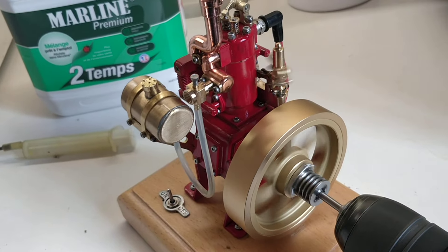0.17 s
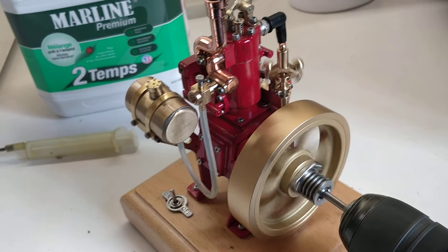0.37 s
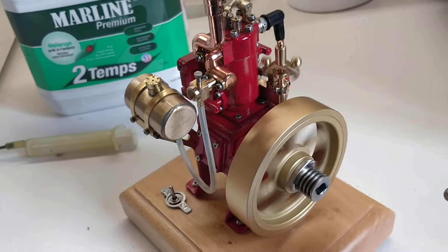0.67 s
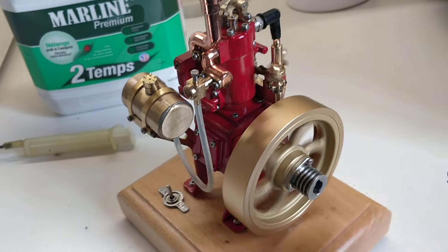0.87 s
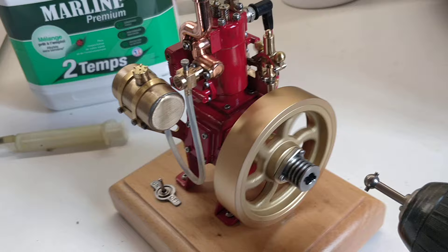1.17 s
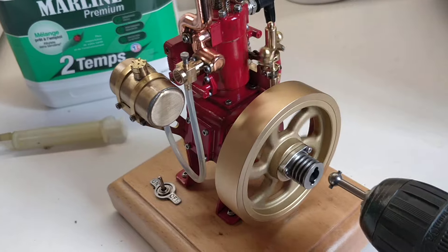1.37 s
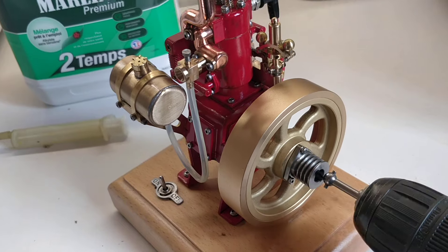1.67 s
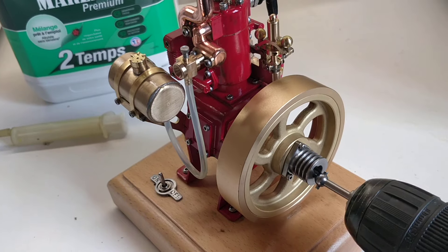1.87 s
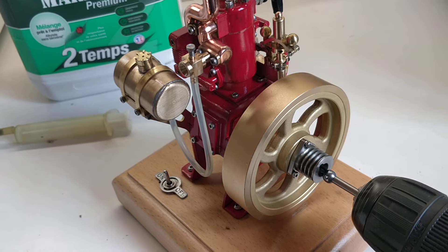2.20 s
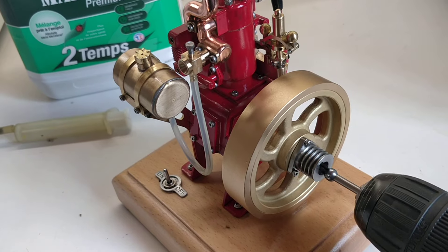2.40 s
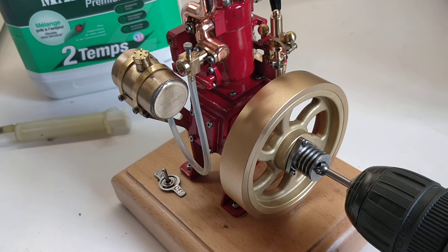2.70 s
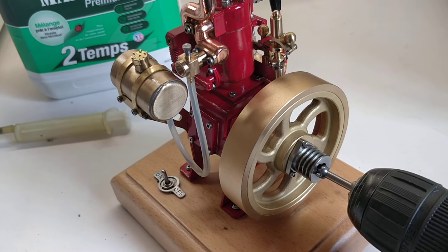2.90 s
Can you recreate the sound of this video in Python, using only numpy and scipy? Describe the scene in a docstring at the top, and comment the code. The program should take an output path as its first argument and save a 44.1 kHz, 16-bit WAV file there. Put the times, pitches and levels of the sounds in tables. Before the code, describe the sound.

A cordless drill whines while cranking a small engine, then winds down with metallic clicks.

```python
"""Cordless drill cranking a model engine

Close microphone at a bench in a small workroom, mono. The drill spins the flywheel, is pulled off and
brakes; the engine never fires. Light handling ticks, a blip of the trigger, and the bit is seated in
the hub again. The motor whines on its shaft orders, the gears rattle; a faint hum beats behind it."""
import sys
import numpy as np
from scipy import signal
from scipy.fft import rfft, irfft
from scipy.io import wavfile
from scipy.ndimage import uniform_filter1d

SR = 44100
rng = np.random.default_rng(int(sys.argv[2]) if len(sys.argv) > 2 else 0)


def store_wav(level_fs):
    """Save 16-bit WAV to argv[1]."""
    pcm = np.round(np.clip(np.atleast_2d(level_fs), -1, 1) * 32767)
    wavfile.write(sys.argv[1], SR, pcm.T.astype(np.int16))


N = 134505
T = np.arange(N) / SR

# room tone: f/Hz, relative level/dB
AIR_SPECTRUM = [(18, -43.5), (30, -14), (137, -10.5), (235, -17), (290, -11.5), (411, -18.5), (507, -16.5),
                (570, -20.5), (2260, -26.5), (3220, -24), (3610, -26.5), (7120, -35.5), (8000, -45),
                (10400, -78.5), (17600, -120)]
# hum lines: f/Hz, level/dB
HUM_LINES = [(226.4, -63), (244.1, -63.5), (247.8, -70), (96.9, -77), (172.3, -77), (344.5, -78)]
# handling: t/s, low level/dB, middle level/dB, high level/dB, ring f/Hz, ring level/dB
HANDLING_TICKS = [(.864, -55.5, -50, -50, 1690, -37.5), (.890, -40.5, -59, -59, 1054, -48),
                  (0.9243, -63, -40, -49, 3616, -38), (.971, -51.5, -48.5, -59, 3580, -50),
                  (1.093, -63, -51.5, -61, 1844, -52), (1.148, -64.5, -47, -49.5, 1660, -43),
                  (1.362, -69, -48, -67, 3510, -48), (1.437, -62, -55, -56, 3950, -57),
                  (1.448, -49.5, -63, -65, 520, -75), (1.725, -50, -47.5, -62, 1293, -56),
                  (1.813, -48.5, -69, -72, 1223, -60), (1.858, -49, -48.5, -56, 875, -46),
                  (1.870, -55, -70, -55, 2440, -47), (2.262, -57, -55, -62, 2502, -65),
                  (2.518, -60.5, -63, -62, 2877, -54), (2.544, -65, -59, -62, 1543, -58),
                  (2.711, -45, -49.5, -47.5, 5020, -42.5), (2.763, -52, -54, -52, 5110, -52)]
# low, middle and high resonance of a tick: f/Hz, width/Hz
TICK_RESONANCES = [(1000, 540), (1900, 1370), (4200, 2640)]
# knocks through the wooden base: t/s, level/dB, f/Hz, decay/s
BASE_KNOCKS = [(0.3482, -11, 194, 0.0043), (.889, -35, 223, 0.0045), (1.448, -40.5, 380.7, .006),
               (2.292, -52, 299.7, 0.019), (2.718, -50, 170, 0.017), (2.773, -45, 129.4, 0.014)]
# bit, chuck and spindle lock: t/s, ring level/dB, crack level/dB, crack decay/s
STEEL_CLACKS = [(0.065, -17.5, -15, 0.01), (.115, -32, -17.5, .008), (0.123, -30, -10.5, .009),
                (.331, -4, -13, .003), (0.3413, -13.5, -10.5, 0.0048), (.348, -8.5, -12.5, .006),
                (.357, -16.5, -20, .008), (0.447, -28.5, -19.5, 0.0057), (0.719, -12.5, -20, .006),
                (0.7567, -13, -19, 0.0018), (2.011, -22.5, -23, .005), (2.087, -35, -23, 0.0088),
                (2.127, -20, -22, 0.0039)]
# chuck modes: f/Hz, relative level/dB, t60/s
CHUCK_MODES = [(1750, -9, .03), (2610, 0, .02), (2850, -2, .016), (3080, -8, .018), (4230, -8, .018),
               (4750, -8, .018), (6650, -12, .015)]
# crack of steel on steel: f/Hz, relative level/dB
CRACK_SPECTRUM = [(60, -40.5), (200, -17.5), (700, -3), (1500, -0.5), (3300, 3), (5000, 2.5), (6000, 0),
                  (8000, -5.5)]
# speed controller at part throttle: t/s, f/Hz, level/dB
WHISTLE_PATH = [(1.971, 5280, -56), (1.9763, 4743, -23.5), (1.981, 3383, -28.5), (2.002, 3370, -28.5),
                (2.025, 3786, -33), (2.056, 3990, -29.5), (2.068, 4700, -25), (2.077, 4630, -35)]
# gearbox and housing response: f/Hz, relative level/dB
HOUSING_SPECTRUM = [(40, -31), (75, -29), (125, -10), (260, -15.5), (400, -10), (600, -10), (1000, -1.5),
                    (1400, -4), (1780, 2.5), (2250, -3), (2600, 0), (3200, -3), (4000, -1), (4950, -4),
                    (5600, -5.5), (7100, -0.5), (8000, -8)]
# motor whine: multiple of shaft speed, level/dB re gear noise
SHAFT_ORDERS = [(1, -15.5), (2, -24.5), (3, -15.5), (4, -19.5), (5, -21.5), (6, -13.5), (8, -16), (9, -16),
                (10, -19), (11, -21), (12, -15), (13, -20), (14, -23), (15, -19.5), (17, -21), (21, -18)]
# gear mesh tones: multiple of shaft speed, level/dB re gear noise
MESH_TONES = [(.79, -19), (2.395, -25), (6.45, -20), (7.57, -16), (7.88, -18.5), (8.47, -19), (8.66, -16),
              (10.17, -16.5), (14.75, -16.5)]
# long pull, until the trigger is let go: t/s, shaft f/Hz, gear noise level/dB
CRANKING_RUN = [(0, 335, -20), (.088, 328, -21.5), (.22, 332.8, -20.5), (.32, 330.1, -19.5),
                (.41, 335.9, -20), (.53, 331, -22), (.66, 330.4, -21), (.713, 328.3, -21)]
# short pull: t/s, shaft f/Hz, gear noise level/dB
TRIGGER_BLIP = [(1.959, 4.98, -42), (1.975, 45, -48), (1.995, 100.7, -31.5), (2.015, 153, -31),
                (2.035, 197, -26.5), (2.06, 222, -31), (2.081, 228, -28.5)]


def undb(db):
    """Decibels to gain."""
    return 10 ** (np.asarray(db) / 20)


def unit(x):
    """Scale to rms 1."""
    return x / (np.std(x) + 1e-12)


def walk(rate):
    """Smooth random drift with a spread of 1."""
    step = max(int(SR / rate), 2)
    return unit(uniform_filter1d(np.repeat(rng.standard_normal(N // step + 1), step), step)[:N])


def colour(x, points):
    """Filter by a curve of f/Hz, level/dB; rms 1."""
    hz, db = np.array(points).T
    f = np.arange(N // 2 + 1) * SR / N
    return unit(irfft(rfft(x) * undb(np.interp(np.log(f + 1), np.log(hz), db)), N))


def band(x, hz, width):
    """One resonance."""
    return signal.lfilter(*signal.iirpeak(hz, hz / width, fs=SR), x)


def low_cut(x, hz, order):
    """Roll off the bass."""
    return signal.sosfilt(signal.butter(order, hz, "high", fs=SR, output="sos"), x)


def burst(start, decay):
    """Envelope of a contact: instant rise, exponential fall."""
    return (T >= start) * np.exp(-np.abs(T - start) / decay)


def room_tone(air_db=-64):
    """Closely spaced hum lines beat against each other over still room air."""
    hum = 0
    for hz, db in HUM_LINES:
        phase = 2 * np.pi * hz * T + .34 * walk(1.7) + rng.uniform(0, 2 * np.pi)
        hum += np.sqrt(2) * undb(db) * np.sin(phase)
    return hum + undb(air_db) * colour(rng.standard_normal(N), AIR_SPECTRUM)


def room(x, wet_db, onset_s=.0078, t60_s=.23):
    """The workroom's short diffuse tail reaches the microphone just after the direct sound."""
    tail = colour(rng.standard_normal(N), [(100, -7.5), (600, 3.5), (3000, 3.5), (8000, .5)])
    tail *= burst(onset_s, t60_s / np.log(1000))
    return x + undb(wet_db) * signal.fftconvolve(x, tail / np.sqrt(np.sum(tail ** 2)))[:N]


def handling_ticks(noise_decay_s=.0047, ring_decay_s=.0038):
    """Small contacts excite three broad resonances and a short ring of the part that is touched."""
    out = 0
    for k, (hz, width) in enumerate(TICK_RESONANCES):
        contact = sum(undb(row[k + 1]) * burst(row[0], noise_decay_s) for row in HANDLING_TICKS)
        out += contact * unit(band(band(rng.standard_normal(N), hz, width), hz, 2 * width))
    for start, *_, hz, db in HANDLING_TICKS:
        out += undb(db) * burst(start, ring_decay_s) * np.sin(2 * np.pi * hz * (T - start))
    return out


def base_knocks(rise_s=.0012, upper_ratio=1.7, upper_db=-4.5):
    """The engine rocks on its wooden base: soft contacts that ring briefly in two low modes."""
    out = 0
    for start, db, hz, decay in BASE_KNOCKS:
        phase = 2 * np.pi * hz * (T - start)
        modes = np.sin(phase) + undb(upper_db) * np.sin(upper_ratio * phase)
        out += undb(db) * (burst(start, decay) - burst(start, rise_s)) * modes
    return out


def steel_clacks(detune=.013):
    """Steel chatters on steel: a crack, and the chuck rings."""
    contact = sum(undb(db) * burst(start, decay) for start, _, db, decay in STEEL_CLACKS)
    crack = contact * colour(rng.standard_normal(N), CRACK_SPECTRUM)
    ring = np.zeros(N)
    for start, db, _, _ in STEEL_CLACKS:
        ringing = (T >= start) & (T < start + .1)
        age = T[ringing] - start
        for hz, mode_db, t60 in CHUCK_MODES:
            pitch = hz * (1 + detune * rng.standard_normal())
            mode = np.sin(2 * np.pi * pitch * age + rng.uniform(0, 2 * np.pi))
            ring[ringing] += undb(db + mode_db) * np.exp(-age * np.log(1000) / t60) * mode
    return crack + ring


def controller_whistle(flutter_db=2.5):
    """The chopped motor current sings while the trigger is half pulled."""
    times, hz, db = np.array(WHISTLE_PATH).T
    pitch = np.interp(T, times, hz) * (1 + .03 * walk(500))
    gain = undb(np.interp(T, times, db) + flutter_db * walk(400)) * (T > times[0]) * (T < times[-1])
    return gain * np.sin(2 * np.pi * np.cumsum(pitch) / SR)


def whine(angle, flicker_db=2.5):
    """Motor orders and gear mesh tones follow the shaft angle, each flickering in level."""
    motor = sum(undb(db + flicker_db * walk(35)) * np.sin(order * angle + rng.uniform(0, 2 * np.pi))
                for order, db in SHAFT_ORDERS)
    mesh = sum(undb(db + flicker_db * walk(35)) * np.sin(ratio * angle + .86 * walk(40))
               for ratio, db in MESH_TONES)
    return low_cut(motor + mesh, hz=292, order=4)  # the small housing radiates little below this


def gear_rattle(angle, impacts_per_s=5000, scatter_db=.5, carrier_ratio=.338):
    """Tooth impacts and brush noise sound through the housing, pulsing as the gear carrier turns."""
    teeth = (rng.random(N) < impacts_per_s / SR) * rng.standard_normal(N)
    teeth *= undb(scatter_db * rng.standard_normal(N))
    brushes = .81 * rng.standard_normal(N)
    pulsing = 1 + .095 * np.sin(carrier_ratio * angle + walk(30))
    return colour(unit(teeth) + brushes, HOUSING_SPECTRUM) * pulsing


def free_chuck(rattle, start_s=.4, rise_s=.38, hz=1761, width_hz=58, db=-15.5):
    """Out of the hub, the chuck rings freely with the rattle."""
    freedom = np.clip((T - start_s) / rise_s, 0, 1)
    return undb(db) * freedom * unit(band(band(rattle, hz, width_hz), hz, 3 * width_hz))


def drill(run, load, brake_hz_per_s=5400, jitter=.004, growl_db=3.5):
    """One pull of the trigger: whine and rattle, then the electric brake growls the motor to a stop."""
    times, hz, db = np.array(run).T
    speed_left = np.clip(1 - (T - times[-1]) * brake_hz_per_s / hz[-1], 0, 1)
    speed = np.interp(T, times, hz) * speed_left
    angle = 2 * np.pi * np.cumsum(speed * (1 + jitter * walk(90))) / SR
    gain = undb(np.interp(T, times, db)) * (T >= times[0])
    tones = whine(angle)
    rattle = gear_rattle(angle)
    # torque ripple grows with the current: steady load plus speed change, 1 being full braking
    speed_change = np.abs(np.gradient(uniform_filter1d(speed, size=256))) * SR / brake_hz_per_s
    ripple = speed_left * (load + speed_change) * np.sin(3 * angle)
    growl = undb(growl_db) * band(ripple, hz=680, width=240)  # sweeps through a housing resonance
    return gain * (speed_left ** .79 * (tones + rattle + free_chuck(rattle)) + growl)


def scene():
    """The bench from close by, the same in both channels."""
    pulls = drill(CRANKING_RUN, load=.037) + drill(TRIGGER_BLIP, load=.18)
    bench = room(pulls + controller_whistle() + base_knocks() + handling_ticks(), wet_db=-12.5)
    bench += room(steel_clacks(), wet_db=-15.5)
    mono = low_cut(bench, hz=65, order=3) + room_tone()  # the deep bass rolls off below about 65 Hz
    return np.array([mono, mono])


def record(dry):
    """The recorder rounds the loudest peaks and cuts the top steeply."""
    ceiling, top_hz = .75, 7900
    rounded = dry / (1 + (dry / ceiling) ** 4) ** .25
    taps = signal.firwin(161, top_hz, window=("kaiser", 8), fs=SR)
    return signal.fftconvolve(rounded, taps[None], mode="same", axes=1)


dry = scene()
out = record(dry)
store_wav(out)
```